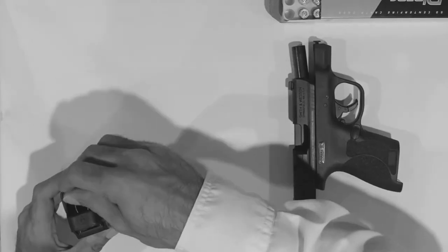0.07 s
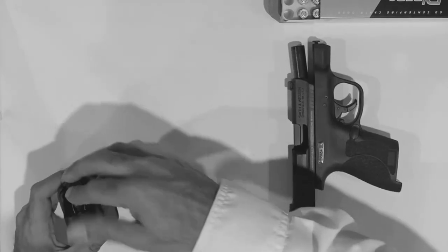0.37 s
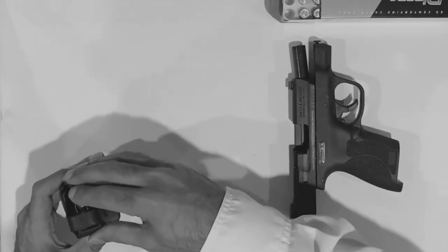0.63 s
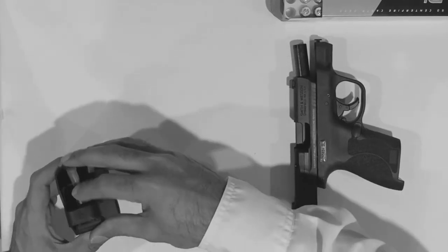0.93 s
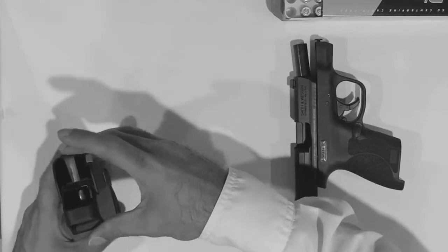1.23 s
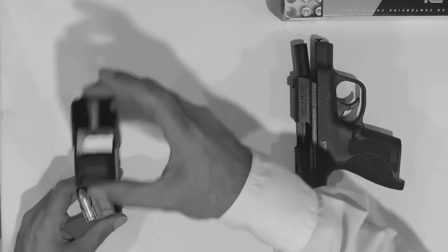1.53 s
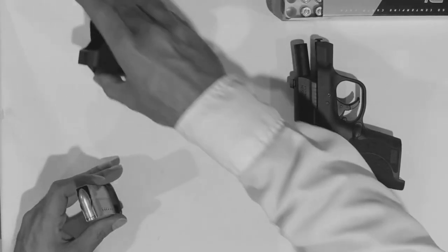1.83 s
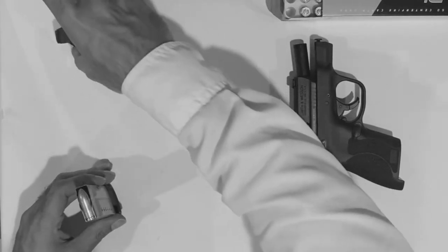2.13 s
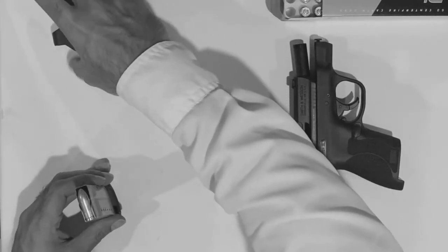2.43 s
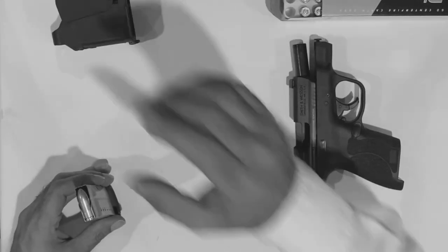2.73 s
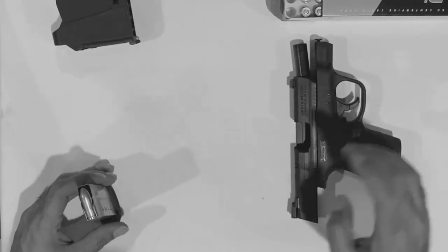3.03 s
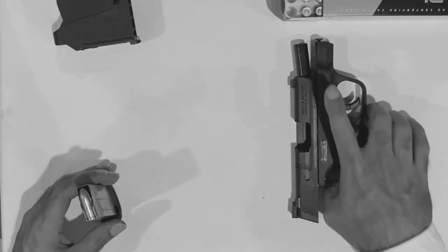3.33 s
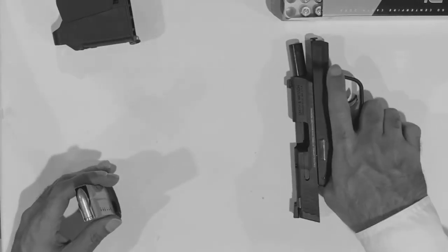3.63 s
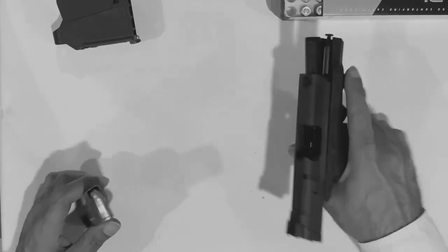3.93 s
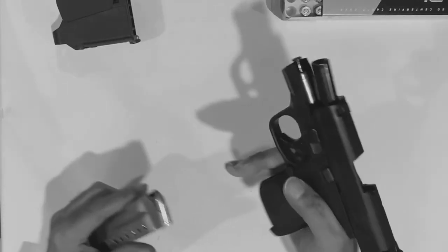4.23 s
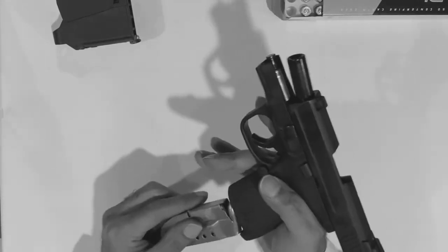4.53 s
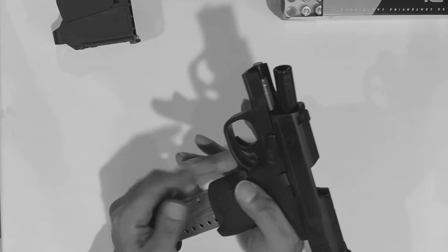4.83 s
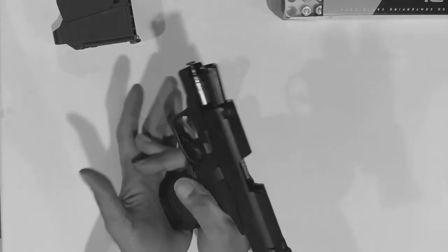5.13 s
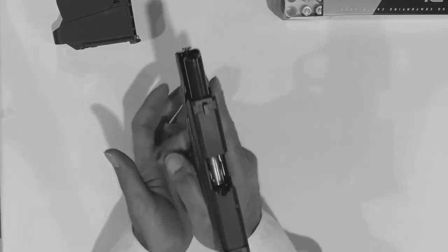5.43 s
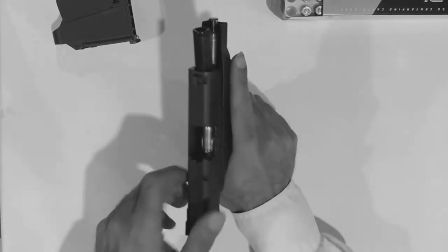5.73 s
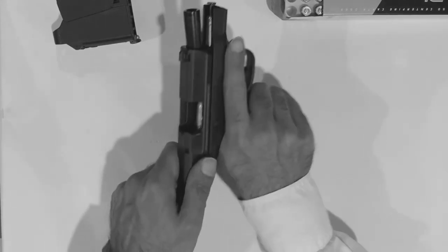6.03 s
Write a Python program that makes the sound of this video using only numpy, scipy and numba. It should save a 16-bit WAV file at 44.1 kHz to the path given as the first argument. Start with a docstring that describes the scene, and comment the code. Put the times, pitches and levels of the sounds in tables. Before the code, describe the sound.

Plastic clicks, rubs and table knocks in a bare room, then a magazine rattles into a handgun and locks with a sharp metallic snap.

```python
"""Loading a pistol at a table

Close up, a plastic loader is worked off a pistol magazine, ticking against the brass, and put aside. The pistol
is picked up, the magazine chatters up the hollow grip and snaps home, and the gun is bumped down on the ringing
table. Hands and parts rub and creak between the clicks. A bare, live room answers every blow, until everything
breaks off abruptly at 5.93 s and leaves only a faint hiss."""
import sys
import numpy as np
from scipy import signal
from scipy.fft import rfft, irfft, next_fast_len
from scipy.io import wavfile
from scipy.ndimage import uniform_filter1d, minimum_filter1d
from numba import njit

SR = 44100
rng = np.random.default_rng(int(sys.argv[2]) if len(sys.argv) > 2 else 0)


def put_to_file(sound):
    """Save the sound as 16-bit audio at rate SR, in the file named by the first command-line argument."""
    columns = np.atleast_2d(sound).T  # one column per channel
    safe = np.clip(columns, -1, 1)
    whole_steps = np.round(safe * 32767)
    wavfile.write(sys.argv[1], SR, whole_steps.astype(np.int16))


N = 272538
T = np.arange(N) / SR
SCUFF_LEAD_S = 0.015  # a scuff runs this far ahead of each click
SLIDE_START_S, SEATED_S, LATCH_S = 4.982, 5.1, 5.1087  # the magazine slides, seats and is caught


def pistol(chatter_count=8):
    """Loose contacts rebound; the magazine chatters ever louder up the well until the catch snaps."""
    # steel clicks, and a woody crack as the pistol hits the table:
    # start_s, level_db, treble_db, band_hz, band_lift_db
    clicks = [(3.3198, -51.5, -1.5, 4000, 0), (3.4859, -34.5, 0, 4000, 3.5), (3.947, -37.5, -11, 3700, 4),
              (4.045, -40, -11, 3100, 7), (4.065, -33, -5, 2800, 1), (4.071, -26.5, -4, 1500, 10),
              (4.1932, -35, -3, 3600, 9.5), (4.211, -40, 0, 2760, 12), (4.219, -34.5, -9.5, 2270, 10),
              (4.6125, -27, -6.5, 2800, 9), (4.623, -30.5, -17, 2200, -7), (4.677, -22, -8, 3750, 7),
              (4.8034, -32, -9.5, 2900, 8.5), (4.8918, -25.5, -7, 1500, 6), (4.898, -32, -14, 3500, 0.5),
              (5.0215, -26.5, -9, 2500, 11.5), (5.0349, -25.5, 1.5, 9800, 6.5),
              (5.0388, -19, -13.5, 2200, 3), (5.072, -32.5, -3, 3000, 12.5), (5.079, -26, 7.5, 9000, 7),
              (5.0926, -19, -11, 2050, 10.5), (5.1015, -21.5, -2, 2190, 13.5),
              (5.1105, -29, -12.5, 1920, 12.5), (5.188, -20, 4, 2000, 1.5), (5.435, -39, 2, 8000, -1.5),
              (5.4542, -28.5, -4.5, 2500, -3.5), (5.6349, -33.5, -10, 1322, 16.5),
              (5.9235, -40, -9, 2700, 4.5)]
    # loose parts touch again, softer and duller
    rebounds = [(s + 0.007, db - 6.5, treble_db - 15.5, *band) for s, db, treble_db, *band in clicks]
    travel = (np.arange(chatter_count) + rng.random(chatter_count)) / chatter_count
    chatter = [(SLIDE_START_S + x * (LATCH_S - SLIDE_START_S), -43 + 7 * x, -4, 2480, 8) for x in travel]
    latch = (LATCH_S, -5.5, 7, 3430, 6)
    out = np.zeros(N)
    for s, *blow in [*clicks, *rebounds, *chatter, latch]:
        add(out, s - SCUFF_LEAD_S, pistol_click(s, *blow))
    return out


def pistol_click(s, db, treble_db, band_hz, lift_db, crack_db=7, ring_db=-20.5):
    """One click or crack; the hand-damped parts sing on briefly, in a different mix after every blow."""
    # modes of slide, frame and magazine tube: pitch_hz, level_db, t60_s
    modes = [(1490, -6, .15), (1992, -6, .2), (2378, -2, .2), (3120, 1, .25), (3236, -1, .2),
             (3990, -6, .1), (6159, -9, .2), (8057, -6, .2), (8327, -7, .3), (8513, -7, .25),
             (8727, -9, .2), (9092, -9, .2)]
    # tone of the attack: frequency_hz, level_db
    tone = [(150, -8.5), (450, 8.5), (880, -4.5), (1150, -7.5), (2000, 0), (3100, -1), (4000, -1),
            (5000, 3), (6300, -3), (8500, -4.5), (10200, -8), (12100, -17), (14200, -19), (16500, -28)]
    t60 = 0.022 * 2 ** ((-28.5 - db) / 29.5)  # firmer blows are shorter
    # lowest body resonance: parts apart, parts joined, then the small, stiff catch
    body_hz = 1300 if s < SEATED_S else 840 if s < LATCH_S else 1280
    tone = favour(tone, band_hz, lift_db)
    attack = crack(db + crack_db, treble_db, t60, tone, rise_s=0.00081, top_share=.8)
    out, t = np.zeros(SR // 2), T[:SR // 3]
    add(out, 0, high_pass(attack, body_hz, order=3))
    for (hz, mode_db, mode_t60), chance in zip(modes, rng.random(len(modes))):
        level_db = db + ring_db + mode_db + treble_db * (hz > 5400)
        add(out, SCUFF_LEAD_S, (1 + chance) / 2 * ping(t, hz, level_db, mode_t60))
    return out


def grip_knocks(pivot_hz=860):
    """The magazine knocks on the wall of the hollow grip."""
    # knocks in the well: start_s, level_db, tilt_db_per_octave
    knocks = [(4.615, -52, -14), (4.649, -46, -9), (4.804, -44.5, -14.5), (4.872, -44, 3),
              (4.8925, -34, 5.5), (4.932, -52, -1), (5.003, -41, -6), (5.039, -38, -2), (5.0945, -28, -0.5)]
    # modes of the hollow grip: pitch_hz, level_db, t60_s
    modes = [(614, -2, .034), (753, 1, .016), (870, -3, .06), (1080, -9, .03), (1469, -2, .069),
             (1950, -7.5, .05), (2110, -3.5, .05)]
    out, t = np.zeros(N), T[:SR // 4]
    for s, db, tilt in knocks:
        for hz, mode_db, t60 in detuned(modes):
            add(out, s, ping(t, hz, db + mode_db + tilt * np.log2(hz / pivot_hz), t60))
    return high_pass(out, hz=423, order=5)


def loader(gain_db=5, stray_count=6):
    """The plastic loader ticks on the magazine lips and cartridges; the sharper a tick, the shorter."""
    # loader contacts: start_s, level_db, treble_db, band_hz, band_lift_db
    clicks = [(0.1048, -34, -1.5, 6150, 6), (0.244, -34, 0, 10100, 3.5), (.305, -36, -12, 1450, 18),
              (.3193, -34.5, 14, 3840, 14), (.328, -22.5, -10.5, 4050, -2), (.4335, -39, -20, 8300, 7),
              (0.7354, -31.5, 9, 4060, 13), (.781, -40.5, 4.5, 2830, 22), (0.8376, -41.5, 14, 3800, 29),
              (.846, -30, 2, 1310, 9), (.868, -30.5, -5.5, 4470, 6.5), (.977, -40, -8, 3620, 10),
              (.997, -40, -2, 8550, 2), (1.1883, -47.5, -17, 1900, -3), (1.277, -42.5, 5.5, 9000, 2.5),
              (1.29, -39, -10, 1360, 16.5), (1.7046, -41.5, 4.5, 7850, 2.5),
              (1.8484, -39.5, -13.5, 2720, 11), (1.8952, -44.5, -13.5, 2580, 17),
              (2.1057, -38.5, 1, 2020, 12), (2.3728, -44.5, -16, 3000, 22), (2.3973, -40.5, -16, 3380, 9),
              (2.5728, -40.5, -15, 3200, 9.5)]
    # tone of the plastic: frequency_hz, level_db
    tone = [(150, -54), (600, -8.5), (1100, -9.5), (2100, -1.5), (2900, -8), (3900, -2), (5300, 4),
            (6500, -2), (7600, 2), (9800, -5), (11800, -9.5), (14000, -13), (16500, -29)]
    # faint stray ticks while it is worked loose
    starts = 0.45 + 1.95 * (np.arange(stray_count) + rng.random(stray_count)) / stray_count
    strays = [(s, -57.5 - 5.5 * rng.uniform(-1, 1), 4, 8200, 4) for s in starts]
    out = np.zeros(N)
    for s, db, treble_db, band_hz, lift_db in [*clicks, *strays]:
        t60 = 0.039 * 2 ** (-treble_db / 10)
        tick_tone = favour(tone, band_hz, lift_db)
        tick = crack(db + gain_db, treble_db, t60, tick_tone, rise_s=0.00015, top_share=0.29)
        add(out, s - SCUFF_LEAD_S, tick)
    return out


def cartridge_clinks():
    """Brass cartridges ring high and short as the loader lets them go."""
    # brass touches: start_s, level_db
    clinks = [(0.1046, -37.5), (0.322, -18.5), (0.33, -37), (0.737, -69)]
    # modes of cartridges held in the magazine lips: pitch_hz, level_db, t60_s
    modes = [(3480, -12, .025), (3780, -8, .02), (3960, -6, .025), (6530, -8, .015), (7050, -4, .008),
             (7500, -2, .009), (8000, -4, .008), (9280, -9, .015)]
    out, t = np.zeros(N), T[:SR // 4]
    for s, db in clinks:
        for hz, mode_db, t60 in detuned(modes):
            add(out, s, ping(t, hz, db + mode_db, t60))
    return high_pass(out, hz=2590)


def table_top(build_cycles=1.52, grip_scatter=0.011):
    """Knocks ring the table; a long, soft contact skips the upper modes and a resting hand damps them."""
    # knocks on the table, and two short echoes just after hard knocks:
    # start_s, level_db, contact_ms, ring_ratio
    knocks = [(.107, -32, 1.4, 1.26), (.244, -28.5, 1.1, 0.59), (0.3233, -15, 0.46, 0.12),
              (.359, -25.5, 0.69, 0.27), (0.714, -34, 2.4, 1.3), (0.732, -22.5, 1.05, 0.27),
              (0.767, -28.5, 0.91, 0.49), (.845, -20, 0.79, 0.315), (0.862, -25.5, 2.8, 0.66),
              (0.887, -33, 1.8, 0.77), (1.039, -47, 1.8, 0.14), (1.178, -35.5, 0.77, 0.35),
              (1.293, -40.5, 2.2, 0.46), (1.409, -50, 3, .6), (1.657, -48, 4.4, 1.4),
              (1.847, -39.5, 0.78, 1), (1.897, -31, 0.62, 0.37), (2.175, -23.5, 0.31, 1.3),
              (2.355, -25, 0.16, 0.11), (2.371, -32, 0.4, 0.24), (2.391, -31, .2, 0.22),
              (3.326, -36.5, 1, 0.43), (3.427, -45, 3.5, 0.96), (3.535, -36.5, 1.8, 0.31),
              (3.605, -39, 0.72, 0.49), (3.624, -36.5, 1, 0.34), (5.4544, -7.5, .73, 0.07),
              (5.49, -22.5, 0.57, .2), (5.634, -11, 0.1, 0.75), (5.917, -26, 1.4, 0.17),
              (5.924, -11, 0.58, 0.15)]
    # modes of the table top: pitch_ratio, level_db, t60_s
    modes = [(0.995, -5, 0.23), (1.01, -3, 0.26), (1.119, -10, 0.28), (1.259, -7.5, 0.17),
             (1.54, -7, 0.095), (1.95, -8.5, 0.06), (2.32, -7, 0.081), (2.64, -17.5, 0.34),
             (3.1, -13.5, 0.08), (3.62, -3, 0.021)]
    # lowest mode, higher while the hands bear down on the loader: time_s, pitch_hz
    pitch = [(.1, 408.3), (.4, 402), (.9, 399.2), (1.2, 366.4), (2.2, 365.7), (3.4, 371.6), (5.6, 367)]
    # the many heavily damped modes between the strong ones: frequency_hz, level_db
    clunk_tone = [(100, -28.5), (250, -20), (480, 3.5), (750, 1.5), (1300, -10.5), (2200, -6), (5000, -42)]
    out, t = np.zeros(N), T[:SR // 2]
    for s, db, contact_ms, ring_ratio in knocks:
        hz = np.interp(s, *np.transpose(pitch))
        # the grip shifts the pitch, most in slow, soft contacts
        hz *= 1 + grip_scatter * min(contact_ms, 1) * rng.standard_normal()
        ring = np.zeros(len(t))
        for ratio, mode_db, t60 in modes:
            bloom = 1 - np.exp(-t * hz * ratio / build_cycles)
            ring += bloom * ping(t, hz * ratio, mode_db, t60 * ring_ratio)
        clunk = undb(-10) * fade(t, t60=0.036) * unit(colour(rng.standard_normal(len(t)), clunk_tone))
        thud = ping(t, hz=165, db=-24, t60=0.023)  # the whole table nods under the blow
        body = high_pass(ring, hz=305, order=3) + clunk + high_pass(thud, hz=133)
        push = t * np.exp(-2 * t / (contact_ms / 1000))
        push /= abs(np.sum(push * np.exp(2j * np.pi * hz * t)))  # unity gain at the lowest mode
        add(out, s, undb(db) * signal.fftconvolve(body, push)[:len(t)])
    return out


def creaks(slip_s=0.0019, step_db=-3, octaves=0.093, count=4):
    """A fingertip or an edge sticks and lets go: a few uneven, fading slips into a damped resonance."""
    # sticking points: start_s, level_db, pitch_hz
    sticks = [(0.5745, -40.5, 1965), (0.6214, -43, 2380), (0.6524, -40, 2430), (0.9391, -35.5, 1290),
              (0.9754, -35, 1630), (1.0663, -39, 1540), (1.134, -37, 1550), (1.261, -52, 1600),
              (1.4185, -37.5, 1540), (1.4481, -41, 1570), (1.4778, -43, 1490), (1.609, -44.5, 1570),
              (1.6551, -39.5, 1640), (1.7525, -48, 1520), (1.8175, -50, 1750), (1.947, -39, 1510),
              (2.006, -29, 1460), (2.1496, -43, 1550), (2.2779, -50, 1640), (2.3613, -33.5, 1910),
              (2.3979, -33.5, 1630), (2.612, -39, 2556), (2.665, -42, 1550), (2.712, -47, 1400),
              (2.765, -43.5, 1430), (3.6893, -33, 2030), (3.7517, -41, 1460), (3.8005, -38, 1520),
              (3.904, -42, 1440), (4.0028, -42, 1580)]
    out, t = np.zeros(N), T[:SR // 25]
    for s, db, hz in sticks:
        wait, bend = rng.random((2, count))
        for k in range(count):
            slip_hz = hz * 2 ** (octaves * (2 * bend[k] - 1))
            add(out, s + slip_s * (k + wait[k] / 2), ping(t, slip_hz, db + k * step_db, t60=0.014))
    return high_pass(out, hz=905)


def rubs(gain_db=1, grain_db=2.5, judder_db=4.5, judder_hz=130, edge_s=0.019, scratch_db=11):
    """Sliding contact: dense tiny slips of uneven size come in jerks, with single scratches on top."""
    # skin, sleeve and parts sliding: start_s, end_s, level_db, treble_db, band_hz, band_lift_db
    strokes = [(0.639, 0.752, -43.5, -2.5, 2450, 10.5), (0.762, 1.073, -48, -3, 2130, 8),
               (1.055, 1.344, -58, -29, 1980, 12), (1.399, 1.482, -55, -10, 1890, 12.5),
               (1.588, 1.743, -57.5, 4, 2240, 1), (1.94, 2.12, -45, -4.5, 2200, 0.5),
               (2.132, 2.299, -49.5, -10, 1600, 6), (2.364, 2.419, -43.5, 0.5, 1810, -1),
               (2.538, 2.859, -61.5, 3.5, 2740, 5), (3.407, 3.604, -56.5, 14, 3110, 19.5),
               (3.649, 3.726, -44.5, -4.5, 2300, 12), (3.738, 3.794, -40.5, -3.5, 844, 15),
               (3.787, 3.946, -49, 0.5, 1780, -3.5), (4.036, 4.093, -48.5, 5, 2470, 6.5),
               (4.974, 5.06, -48, 9.5, 2600, 5), (5.07, 5.098, -42, -11, 2287, 2),
               (5.716, 5.865, -58, 3.5, 7900, 2.5)]
    # tone of the friction: frequency_hz, level_db
    tone = [(120, -10), (500, -5), (850, -1), (1100, -6.5), (1480, 13.5), (1850, 2), (2300, 0.5),
            (3200, -7), (5500, -2), (8500, -9.5), (10500, -17), (12000, -40), (15000, -34)]
    slips = rng.standard_normal(N)
    slips *= np.repeat(undb(grain_db * rng.standard_normal(N // 20 + 1)), 20)[:N]
    jerks = np.interp(T * judder_hz, np.arange(N), rng.standard_normal(N))
    slips *= undb(judder_db * jerks)
    out = np.zeros(N)
    for start, end, db, treble_db, band_hz, lift_db in strokes:
        t = T[:int((end - start) * SR)]
        pressure = np.clip(np.minimum(2 * t, t[-1] - t) / edge_s, 0, 1)
        friction = unit(slips[int(start * SR):][:len(t)])
        stroke = colour(friction, favour(tone, band_hz, lift_db), treble_db)
        stroke += undb(scratch_db) * scratches(end - start)
        add(out, start, undb(db + gain_db) * pressure * stroke)
    return out


def scratches(seconds, per_s=85, centre_hz=1800, octaves=0.3, scatter_db=5, count=64):
    """A rubbing edge sticks and slips at an uneven pace; each scratch has its own pitch and size."""
    out, t = np.zeros(N), T[:SR // 25]
    starts = np.cumsum(rng.gamma(2, .5, count)) / per_s
    bends, sizes = rng.standard_normal((count, 2)).T
    for s, bend, size in zip(starts, bends, np.clip(sizes, -2, 1)):
        if s < seconds:
            add(out, s, ping(t, centre_hz * 2 ** (octaves * bend), scatter_db * size, t60=0.0065))
    return high_pass(out[:int(seconds * SR)], hz=1140)


def room_response(gap_s=0.011, build_s=0.002, early_share=0.4, bands=14):
    """Soft early reflections, then the walls answer in full after a short gap; the treble dies first."""
    # decay of the bare room: frequency_hz, t60_s
    decay = [(150, 1.8), (400, .85), (1000, .81), (2500, .72), (4000, .76), (5500, .53), (8000, .47),
             (14000, .3)]
    # tone of the reverb: frequency_hz, level_db
    tone = [(60, -20.5), (165, 10), (370, -2.5), (800, 5.5), (2000, -0.5), (4000, 2), (8000, -0.5),
            (11000, -2), (15000, -12.5)]
    t = T[:SR * 3 // 2]
    hz = np.arange(len(t) // 2 + 1) * SR / len(t)
    spectrum = rfft(rng.standard_normal(len(t))) * undb(along(tone, hz))
    swell = early_share + (1 + np.tanh((t - gap_s) / build_s)) / 2
    centres = np.geomspace(100, 16000, bands)
    out = 0
    for centre, pick in zip(centres, np.eye(bands)):
        band = irfft(spectrum * along(np.c_[centres, pick], hz), len(t))
        envelope = fade(t, along(decay, centre)) * swell
        out = out + band * envelope / np.sqrt(np.sum(envelope ** 2))
    return out


def hiss(level_db=-70.5, first_touch_s=0.105, opening_db=-6.5):
    """Faint steady room noise, fainter still before the first touch."""
    # noise floor: frequency_hz, level_db
    tone = [(15, -35.5), (25, -6), (78, -5.5), (120, -13), (754, -23), (818, -27), (2000, -21), (3340, -31),
            (3920, -17.5), (5140, -31.5), (6560, -22.5), (9840, -28), (11600, -53.5), (13600, -29),
            (16000, -42)]
    gain = undb(along(tone, np.arange(N // 2 + 1) * SR / N))
    mid, side = (unit(irfft(rfft(rng.standard_normal(N)) * gain, N)) for _ in range(2))
    return undb(level_db + opening_db * (T < first_touch_s)) * spread(mid, side, wide_hz=1200, width=0.64)


def microphone_ports(x):
    """Sound reaches the left port a little before the right one."""
    # phase between the two ports: frequency_hz, left_lead_rad
    phase = [(20, 0), (1200, 0), (2500, .8), (4000, 1.3), (5300, 3.1), (7500, 5.7), (9000, 6.7),
             (11800, 9.4), (13800, 12.2), (16400, 12.8)]
    size = next_fast_len(N + SR // 10)
    lead = along(phase, np.arange(size // 2 + 1) * SR / size)
    return irfft(rfft(x, size) * np.exp(.5j * np.array([lead, -lead])), size)[:, :N]


def crack(db, treble_db, t60, tone, rise_s, top_share, scuff_db=-21, scuff_s=0.013):
    """A faint scuff as parts meet, then dense, heavily damped resonances from SCUFF_LEAD_S on."""
    t = T[:SR // 10] - SCUFF_LEAD_S
    after = np.maximum(t, 0)
    blow = fade(after, t60) * (1 - np.exp(-after / rise_s))
    envelope = blow / blow.max() + undb(scuff_db) * np.exp(-np.abs(t) / scuff_s)
    burst = unit(rng.standard_normal(len(t)) * envelope) * np.sqrt(np.mean(envelope ** 2))
    return undb(db) * colour(burst, tone, treble_db, top_share=top_share)


def colour(x, tone, treble_db=0, top_share=0.5, treble_hz=5400, top_hz=12000, size=512):
    """Filter to a tone curve; treble_db brightens or dulls the sound, the very top most."""
    hz = np.arange(size // 2 + 1) * SR / size
    treble, top = ((1 + np.tanh((hz - edge) / 900)) / 2 for edge in (treble_hz, top_hz))
    cepstrum = irfft(np.log(undb(along(tone, hz) + treble_db * (treble + top_share * top))))
    # minimum phase: nothing rings ahead of the attack
    cepstrum[1:size // 2] *= 2
    cepstrum[size // 2 + 1:] = 0
    return signal.fftconvolve(x, irfft(np.exp(rfft(cepstrum))))[:len(x)]


def favour(tone, band_hz, lift_db, octaves=0.13):
    """The place of contact favours one band of a part's tone curve."""
    hz = np.geomspace(80, 17000, 160)
    bell = np.exp(-.5 * (np.log2(hz / band_hz) / octaves) ** 2)
    return np.c_[hz, along(tone, hz) + lift_db * (bell - 0.15)]


def detuned(modes, scatter=0.011):
    """A part rings a little differently at every touch."""
    return [(hz * (1 + scatter * rng.standard_normal()), db, t60) for hz, db, t60 in modes]


def ping(t, hz, db, t60):
    """One struck mode: a decaying sine."""
    return undb(db) * fade(t, t60) * np.sin(2 * np.pi * hz * t)


def high_pass(x, hz, order=2):
    """A small body radiates little below its lowest resonance."""
    return signal.sosfilt(signal.butter(order, hz, "high", fs=SR, output="sos"), x)


def spread(mid, side, wide_hz, width, narrow_hz=5000):
    """Stereo that is narrow in the bass and high treble, and wider between."""
    side = width * signal.sosfilt(signal.butter(1, [wide_hz, narrow_hz], "band", fs=SR, output="sos"), side)
    return np.array([mid + side, mid - side])


def undb(db):
    """Decibels to gain."""
    return 10 ** (np.asarray(db) / 20)


def along(points, hz):
    """Read (Hz, value) points on a log-frequency axis."""
    f, value = np.transpose(points)
    return np.interp(np.log(np.maximum(hz, 1)), np.log(f), value)


def fade(t, t60):
    """Ring-down of 60 dB in t60 seconds."""
    return np.exp(-np.log(1000) * t / max(t60, 1e-3))


def unit(x):
    """Scale to rms 1."""
    return x / np.sqrt(np.mean(x ** 2))


def add(track, s, x):
    """Mix x into the track from time s on."""
    i = int(s * SR)
    track[i:i + len(x)] += x[:N - i]


@njit
def peak_follower(x, keep):
    """Jumps to each peak and sinks back."""
    out, level = np.empty(len(x)), 0.
    for i in range(len(x)):
        level = max(x[i], level * keep)
        out[i] = level
    return out


def scene(room_db=-6, pistol_send_db=-1.5, stop_s=5.929):
    """The handling and its reverb, which break off abruptly at stop_s, over the hiss."""
    gun = pistol()
    handling = loader() + grip_knocks() + cartridge_clinks() + table_top() + rubs() + creaks()
    send = undb(pistol_send_db) * gun + handling  # held up near the microphone, the pistol is drier
    mid, side = (signal.fftconvolve(send, room_response())[:N] for _ in range(2))
    reverb = undb(room_db) * spread(mid, side, wide_hz=550, width=0.58)
    cut = fade(np.maximum(T - stop_s, 0), t60=0.0076)
    return microphone_ports(gun + handling + reverb) * cut + hiss()


def record(dry, ceiling=0.88, release_s=0.012, top_hz=16400):
    """A fast limiter ducks the loudest snap; the very top is cut."""
    peaks = peak_follower(np.abs(dry).max(axis=0), np.exp(-1 / (release_s * SR)))
    gain = ceiling / np.maximum(peaks, ceiling)
    gain = uniform_filter1d(minimum_filter1d(gain, size=65), size=65)  # eases in just ahead of the peak
    return signal.sosfilt(signal.ellip(8, .2, 70, top_hz, fs=SR, output="sos"), dry * gain)


dry = scene()
out = record(dry)
put_to_file(out)
```